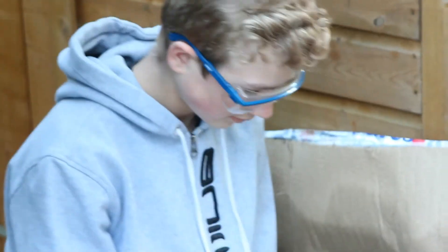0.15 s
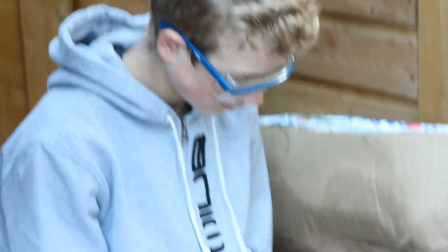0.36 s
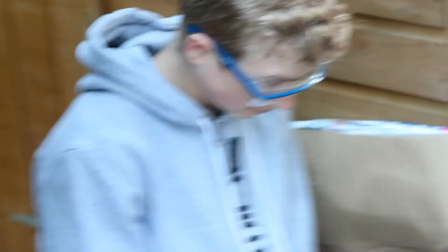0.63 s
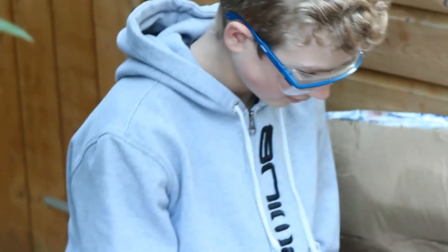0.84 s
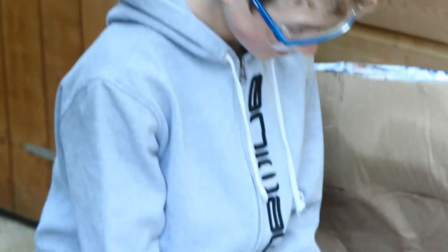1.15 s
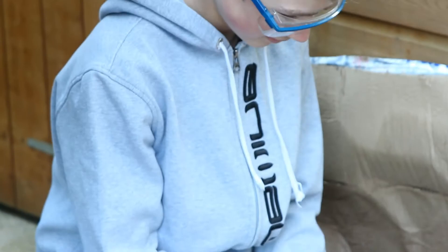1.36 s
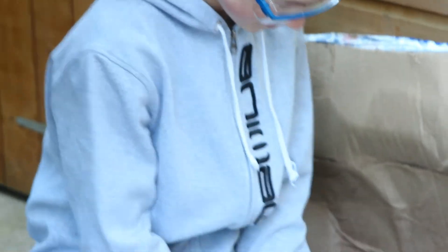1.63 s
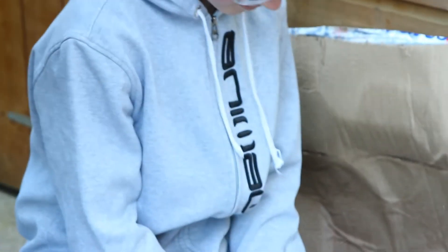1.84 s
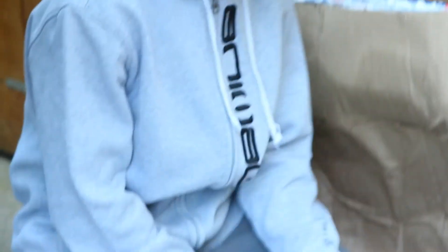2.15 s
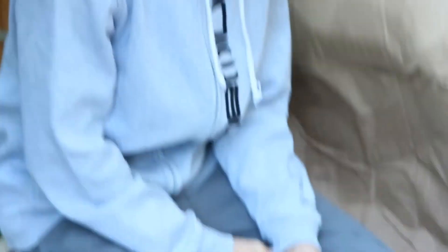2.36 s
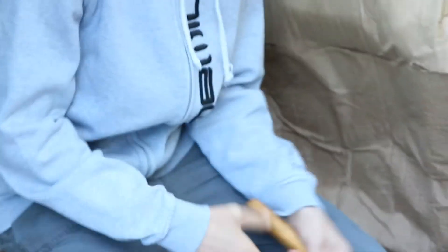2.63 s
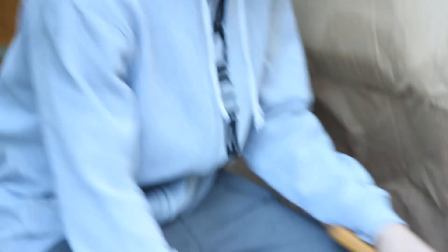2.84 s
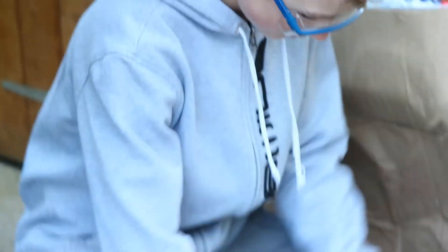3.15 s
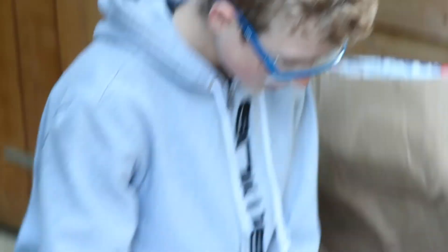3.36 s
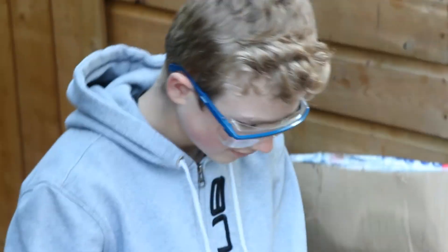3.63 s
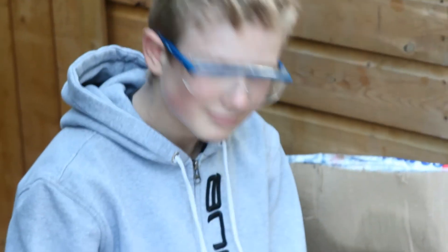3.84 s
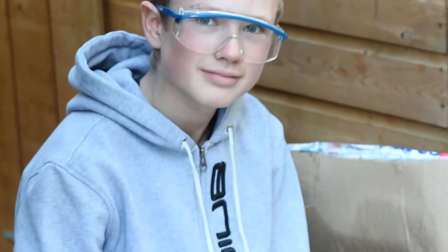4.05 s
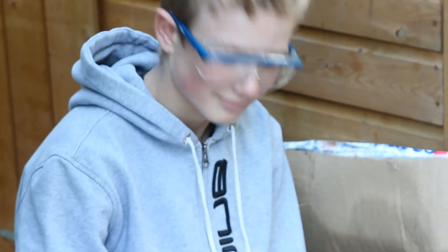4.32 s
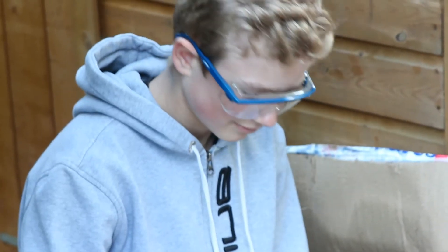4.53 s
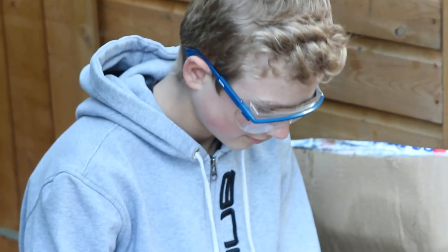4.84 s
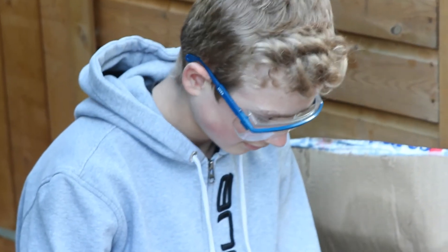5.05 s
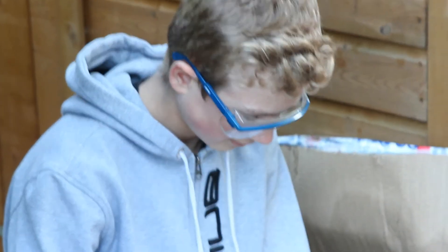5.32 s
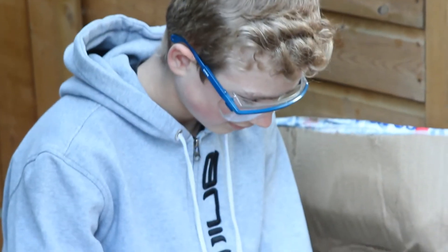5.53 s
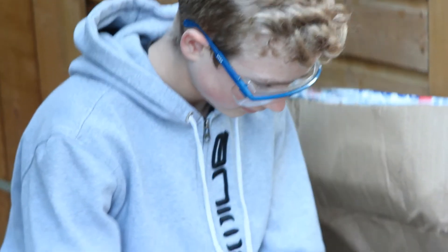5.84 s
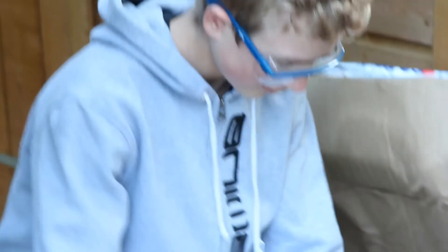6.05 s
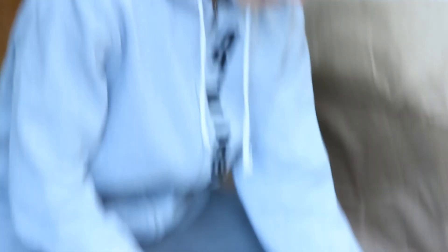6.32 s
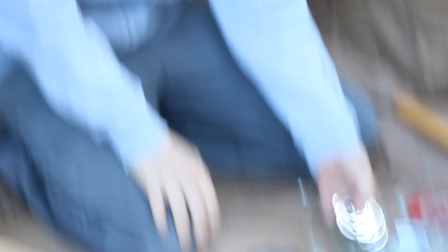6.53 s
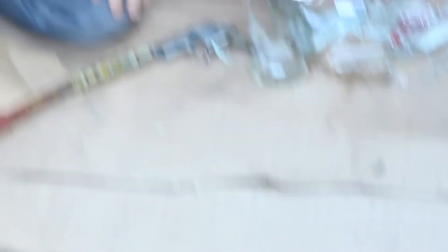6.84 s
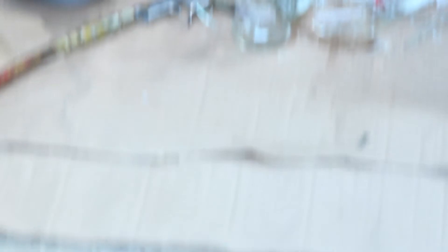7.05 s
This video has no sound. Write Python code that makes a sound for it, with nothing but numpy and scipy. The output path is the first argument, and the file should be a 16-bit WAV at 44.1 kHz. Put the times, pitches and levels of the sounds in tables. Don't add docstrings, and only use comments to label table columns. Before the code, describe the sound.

Close microphone in a yard with short echoes. A buzzing, whining compressor runs without stopping. Three violent glass knocks come half a second apart, then a crash and a brief spray of shards. Sparse clinks follow as pieces are handled. A bright jet of compressed air starts with a tiny rising whistle and stops abruptly; a few pieces knock and clink near the end. The motor sound ducks after loud events and swells back.

```python
import sys
import numpy as np
from scipy import signal
from scipy.io import wavfile
from scipy.ndimage import uniform_filter1d

SR = 44100
rng = np.random.default_rng(int(sys.argv[2]) if len(sys.argv) > 2 else 0)


def volts_from_db(level):
    exponent = np.asarray(level, float) / 20
    return 10 ** exponent


def generate_wav(sig):
    pcm = np.round(np.clip(np.atleast_2d(sig).T, -1, 1) * 32767).astype(np.int16)
    wavfile.write(sys.argv[1], SR, pcm)


N = 316638

# pitch as a multiple of the motor speed, level in dB rms.
HUM_TONES = [(2, -55), (4, -35), (5, -44), (7, -35), (9, -44), (10, -45), (11, -37), (12, -37), (15, -36),
             (16, -32), (17, -35), (18, -43), (20, -32), (21, -39), (22, -25.3), (23, -18), (24, -25.6),
             (25, -35), (26, -34), (28, -43), (29, -43), (30, -38), (38, -44), (39, -39), (44, -44),
             (46, -37), (48, -45), (54, -46), (55, -46), (56, -45)]
# time in seconds, level in dB.
WHINE_LEVEL = [(0, -2), (1.6, 1), (2.6, 1.5), (4, 0), (4.8, -0.3), (5.6, -1.5), (6.8, 3), (7.18, 2)]
# time in seconds, hiss level in dB, tilt in dB per octave.
TRIGGER = [
    (4.776, -61.5, -6.5),
    (4.902, -19.5, -0.5),
    (5.11, -17, -2.3),
    (5.26, -18.5, -0.5),
    (5.46, -16, -1),
    (5.862, -24, 1.5),
    (5.922, -63, -8),
]
# start in seconds, ring in dB, rebound delay in seconds, rebound in dB.
RINGING_BLOWS = [
    (0.001, 3, .011, -0.5),
    (0.557, 5, .013, -2),
    (1.083, -7, 0.013, 2),
]


def in_time(rows):
    s, *columns = np.transpose(rows)
    return [np.interp(np.arange(N) / SR, s, c) for c in columns]


def drift(rate_hz):
    r = np.exp(-80 * np.pi * rate_hz / SR)
    noise = rng.standard_normal(N // 40 + 2002)
    slow = signal.lfilter([1], [1, -2 * r, r * r], noise)[2000:]
    return np.interp(np.arange(N) / 40, np.arange(len(slow)), slow / slow.std())


def bands(spectrum, patchy_db, rate_hz, tilt_db=0):
    out = 0
    white = rng.standard_normal((2, N))
    points = np.array(spectrum, float)
    edges = 20 * 2 ** np.arange(0, 9.8, 1 / 3)
    for k, (low, high) in enumerate(zip(edges, edges[1:])):
        hz = np.sqrt(low * high)
        if high < points[0, 0] / 2:
            continue
        level_db = np.interp(np.log(hz), np.log(points[:, 0]), points[:, 1])
        level_db = level_db + tilt_db * np.log2(hz / 7000)
        band_pass = signal.butter(2, [low, high], "band", fs=SR, output="sos")
        band = signal.sosfilt(band_pass, white[k % 2])
        out = out + volts_from_db(level_db + patchy_db * drift(rate_hz)) * band
    return out / out.std()


def add(out, s, sound):
    i = round(s * SR)
    out[i:i + len(sound)] += sound[:N - i]


def dying(t60_s, length_s=.4):
    t = np.arange(round(length_s * SR)) / SR
    return t, volts_from_db(-60 * t / t60_s)


def resonate(clicks, hz, t60_s):
    r = volts_from_db(-60 / (t60_s * SR))
    w = 2 * np.pi * hz / SR
    return signal.lfilter([0, np.sin(w)], [1, -2 * r * np.cos(w), r * r], clicks + 1e-18)


def wind():
    low_pass = signal.butter(2, [20, 110], "band", fs=SR, output="sos")
    low = signal.sosfilt(low_pass, rng.standard_normal(N))
    return volts_from_db(-59 + 2.5 * drift(3)) * low / low.std()


def valve():
    width_hz = 250
    whistle = resonate(rng.standard_normal(N), 7120, 2.5 / width_hz)
    return volts_from_db(-60 + 2 * drift(4)) * whistle / whistle.std()


def cowl():
    width_hz = 80
    song = resonate(rng.standard_normal(N), 2485, 2.4 / width_hz)
    level_db = -43.5 + 1.5 * drift(1.0) + 1.1 * in_time(WHINE_LEVEL)[0]
    return volts_from_db(level_db) * song / song.std()


def faint_orders():
    multiples = range(13, 65)
    strong = dict(HUM_TONES)
    chance = rng.uniform(-1.2, 1, len(multiples))
    return [(m, -46 - .16 * k + 3 * chance[k]) for k, m in enumerate(multiples) if m not in strong]


def compressor(wander_db=2.0, upper_db=1.0):
    # time in seconds, motor speed in turns per second.
    speed = [(0.0, 44.471), (1.5, 44.464), (3.0, 44.471), (4.5, 44.482), (6.0, 44.487), (7.2, 44.48)]
    # multiple of motor speed, level in dB rms.
    crank = [(16.25, -42), (19.5, -49), (20.25, -48), (20.75, -38), (21.25, -35), (21.5, -46), (21.75, -42),
             (22.25, -34), (22.75, -40), (23.25, -31), (23.5, -45), (23.75, -40), (24.25, -43), (24.5, -38),
             (25.25, -42), (25.5, -44), (26.25, -47), (26.75, -45), (27.25, -47), (28.5, -47), (29.25, -48),
             (46.25, -47)]
    # frequency in Hz, level in dB per Hz.
    casing = [(40, -35), (200, -17.5), (400, -12.5), (650, -6), (850, -14), (1020, 5), (1250, -14),
              (1700, -10), (2500, -21), (3000, -20), (5000, -29), (7500, -36.5), (9000, -43.5),
              (15500, -42)]
    mesh = 23
    knock_rad, crank_rad, lag_rad = 1.6, -.45, .75
    turn = 2 * np.pi * np.cumsum(in_time(speed)[0]) / SR
    t = np.arange(N) / SR
    wanders = [volts_from_db(wander_db * drift(0.54)) for _ in range(6)]
    whine = volts_from_db(in_time(WHINE_LEVEL)[0])
    settle = volts_from_db(1 - .8 * t)
    creep = crank_rad + .22 * t
    out = 0
    for k, (multiple, db) in enumerate(HUM_TONES + faint_orders() + crank):
        whole = round(multiple)
        phase = rng.uniform(0, 2 * np.pi)
        swell = wanders[k % 6] * volts_from_db(upper_db * (multiple > 36)) if multiple > 8 else 1
        away = abs(multiple - mesh)
        if away <= 3:
            lead = creep + .7 * (whole < mesh - 1)
            phase = -whole * knock_rad + 4 * (multiple - whole) * lead
            phase = phase - lag_rad * (away in (1, 2)) + np.pi * (multiple == mesh - 2)
            if multiple % 1:
                swell = whine * settle
            else:
                swell = whine ** (1.3 - .6 * away * (away > 1))
        out = out + volts_from_db(db + 3) * swell * np.cos(multiple * turn + phase)
    throb = volts_from_db(0.51 * np.cos(turn - knock_rad))
    return out + volts_from_db(-26) * throb * bands(casing, patchy_db=1.12, rate_hz=4.3)


def leak():
    # time in seconds, pitch in Hz, level in dB.
    glide = [(4.775, 3500, -54), (4.795, 3750, -32), (4.81, 4130, -39), (4.83, 4540, -29),
             (4.86, 4970, -48)]
    hz, db = in_time(glide)
    t = np.arange(N) / SR
    is_open = (t > glide[0][0]) & (t < glide[-1][0])
    breath = uniform_filter1d(rng.standard_normal(N), size=60) * is_open
    return volts_from_db(db) * 8 * breath * np.sin(2 * np.pi * np.cumsum(hz) / SR)


def blow_gun():
    # frequency in Hz, level in dB per Hz.
    nozzle = [(710, -42), (1200, -9), (1270, -13), (1380, -9.5), (1490, -12), (1640, -7), (1950, -7),
              (4000, -2), (8500, -2), (12900, -4.5), (15700, -1)]
    hiss_db, tilt_db = in_time(TRIGGER)
    t = np.arange(N) / SR
    shut = (t < TRIGGER[0][0]) | (t > TRIGGER[-1][0])
    return volts_from_db(hiss_db) * ~shut * bands(nozzle, patchy_db=.9, rate_hz=9, tilt_db=tilt_db)


def debris():
    # time in seconds, ticks per second, level in dB.
    settling = [
        (1.63, 1300, -14),
        (1.7, 1100, -35),
        (1.85, 900, -39),
        (1.95, 250, -45),
        (2.06, 60, -57),
    ]
    start_s = settling[0][0]
    first, last = round(start_s * SR), round(settling[-1][0] * SR)
    per_s, db = (c[first:last] for c in in_time(settling))
    draw = rng.random((3, last - first))
    ticks = (draw[0] < per_s / SR) * volts_from_db(db - 2.3 * np.log(draw[1] + 0.016))
    dealt = (draw[2] * 30).astype(int)
    pitches_hz = rng.uniform(4000, 15800, size=30)
    t60s = rng.uniform(.006, 0.061, size=30)
    out = np.zeros(N)
    add(out, start_s, 1.5 * np.diff(ticks, prepend=0))
    for k, (hz, t60_s) in enumerate(zip(pitches_hz, t60s)):
        add(out, start_s, resonate(ticks * (dealt == k), hz, t60_s))
    return out


def pieces(count=12):
    # start in seconds, pitch in Hz, peak level in dB, 60 dB fade in seconds.
    single = [(1.652, 4430, -9, 0.31), (1.652, 6940, -3.5, 0.068), (1.65, 10400, -15, 0.068),
              (1.655, 12700, -10, 0.07), (1.665, 13680, -18, 0.1), (1.687, 10850, -19, 0.11),
              (1.752, 10700, -24, 0.086), (1.782, 15000, -27, 0.1), (1.797, 6880, -24, 0.12),
              (1.862, 10800, -33, .13), (1.9, 8660, -44, .16), (1.991, 8400, -39, .1),
              (2.885, 13210, -43, .1), (2.945, 7200, -43, .1), (3.093, 3590, -27, .035),
              (3.125, 9980, -48, .1), (3.24, 12250, -43, .1), (3.315, 7150, -40, .1),
              (3.375, 10490, -43, .1), (3.38, 7150, -38, .1), (2.882, 10860, -42, .1),
              (3.42, 6960, -40.5, .1), (3.718, 8210, -45, 0.091), (6.175, 4300, -19, .02),
              (6.383, 12150, -40, .16), (6.383, 13270, -39, .1), (6.58, 12230, -33, .035),
              (6.617, 13400, -30, 0.22), (6.617, 9770, -37, 0.18), (6.617, 6860, -19.5, 0.031)]
    # pitch in Hz, level in dB, 60 dB fade in seconds.
    neck_tones = [(4285, 0, 0.1), (5670, -10, .07), (9600, -23, .1), (11840, -12, 0.24), (13040, -13, .08),
                  (13580, -14, .1)]
    # start in seconds, level in dB.
    bounces = [(2.672, -25.5), (2.694, -24), (2.742, -31)]
    after = 0.021 * (np.arange(count) + rng.uniform(-.3, .3, count))
    pitches_hz = rng.permutation(np.linspace(5700, 15500, count))
    scatter = [(1.678 + s, hz, -29.5 - 66 * s, .1) for s, hz in zip(after, pitches_hz)]
    neck = []
    for s, db in bounces:
        for hz, tone_db, t60_s in neck_tones:
            neck.append((s, hz, db + tone_db + rng.normal(0, 2), t60_s))
    return single + scatter + neck


def shards():
    out = np.zeros(N)
    for s, hz, db, t60_s in pieces():
        t, fade = dying(t60_s, length_s=.12)
        tumble = 1 + 7 * uniform_filter1d(rng.standard_normal(len(t)), size=round(1e6 / hz))
        edges = np.clip(t / 0.0005, 0, 1) * np.clip((.09 - t) / .015, 0, 1)
        add(out, s, volts_from_db(db) * edges * fade * tumble * np.sin(2 * np.pi * hz * t))
    return out


def hollow():
    out = np.zeros(N)
    air, ground, head = (406, -19, 0.33), (55, -34, 0.11), (1493, -0.5, 0.031)   # Hz, dB, fade in s
    for hz, db, t60_s in (air, ground, head):
        t, fade = dying(t60_s)
        for s, *_ in RINGING_BLOWS:
            add(out, s, volts_from_db(db) * fade * np.clip(t / 0.0013, 0, 1) * np.sin(2 * np.pi * hz * t))
    return out


def bottle():
    # pitch in Hz, level in dB, 60 dB fade in seconds.
    first_tones = [(3190, -1, 0.12), (4775, -18, 0.18), (5033, -30, 0.25), (5771, -38, 0.29),
                   (6100, -9, 0.065), (7470, -13, 0.045), (8274, -40, 0.16), (9200, -19.5, 0.1),
                   (10800, -25, 0.15), (11910, -44, 0.18), (12230, -45, 0.16), (13730, -38, 0.11),
                   (15690, -53, 0.29)]
    second_tones = [(3170, -2.5, 0.13), (4130, -25, 0.1), (4800, -17, 0.09), (5840, -14, 0.1),
                    (6000, -14, 0.081), (7130, -21, 0.1), (7300, -17.5, 0.09), (9300, -21, 0.08),
                    (9650, -21, 0.084), (10700, -20, 0.14), (10700, -33, 0.12), (14700, -30, 0.1),
                    (15600, -25, 0.1), (15720, -31, 0.13)]
    third_tones = [(3176, -13, 0.17), (4830, -10.5, 0.14), (5800, -5, 0.2), (6260, -6, 0.14),
                   (6300, -2.5, 0.11), (7340, -5, 0.097), (8500, -30, 0.21), (8931, -33, 0.12),
                   (9800, -15.5, 0.097), (11600, -7, 0.2), (12700, -11, 0.086), (13800, -3, 0.12),
                   (14540, -25, 0.16), (15200, -14, 0.096)]
    out = np.zeros(N)
    for blow, tones in zip(RINGING_BLOWS, (first_tones, second_tones, third_tones)):
        s, db, after, rebound_db = blow
        for hz, tone_db, t60_s in tones:
            t, fade = dying(min(t60_s, 1100 / hz))
            split = rng.uniform(.003, .009)
            phase = rng.uniform(0, 2 * np.pi, 2)
            twin = 0.43 * np.sin(2 * np.pi * hz * (1 + split) * t + phase[0])
            tone = fade * (np.sin(2 * np.pi * hz * t) + twin)
            chatter = 1 + 5 * uniform_filter1d(rng.standard_normal(len(t)), size=150)
            tone = tone * chatter
            add(out, s, volts_from_db(db + tone_db) * tone)
            add(out, s + after, volts_from_db(db + tone_db + rebound_db) * np.cos(phase[1]) * tone)
    return out


def cracks():
    # start in seconds, peak level in dB, knock pitch in Hz, knock level in dB.
    contacts = [(.0004, -0.5, 6000, -6), (0.5554, 4.5, 4300, 5.5), (1.083, 8, 4800, -1.5),
                (1.6299, 4.5, 4580, 6.5), (1.648, -9.5, 3120, 3), (1.737, -16.5, 4200, 7.5),
                (1.752, -16, 5780, -2), (1.808, -16, 12500, -8), (1.842, -23, 8400, -4),
                (1.991, -36, 9000, -4), (2.252, -39.5, 2920, 27), (2.671, -26, 11000, -9),
                (2.6953, -29, 9450, -10), (2.7437, -28.5, 8900, 1), (2.765, -32, 3320, 11),
                (2.8814, -33, 13000, -0.5), (3.098, -38, 9150, 1.5), (3.2194, -44, 14400, 4),
                (3.3844, -35.5, 10600, -5), (3.7174, -35, 14800, -2), (6.1738, -11.5, 4650, 11),
                (6.382, -20.5, 4000, -3), (6.579, -31, 7000, 3.5), (6.5914, -38, 9000, 5.5),
                (6.6172, -11, 1580, 9)]
    out = np.zeros(N)
    wide = signal.butter(1, [2500, 14000], "band", fs=SR, output="sos")
    dull = signal.butter(2, [450, 2100], "band", fs=SR, output="sos")
    for s, db, hz, knock_db in contacts:
        t, fade = dying(0.04, length_s=.2)
        noise = rng.standard_normal((3, len(t))) * fade
        spot = signal.butter(2, [hz / 1.197, hz * 1.085], "band", fs=SR, output="sos")
        burst = signal.sosfilt(wide, noise[0])
        thud = volts_from_db(10.5 + .1 * db) * signal.sosfilt(dull, noise[1])
        knock = volts_from_db(knock_db + 13.0) * signal.sosfilt(spot, noise[2] * fade)
        add(out, s, volts_from_db(db - 6) * (burst + thud + knock))
    return out


def yard(x):
    t, fade = dying(0.2, length_s=.3)
    echoes = rng.standard_normal(len(t)) * fade * (t > .003)
    return x + volts_from_db(-8) * signal.fftconvolve(x, echoes / np.linalg.norm(echoes))[:N]


def scene():
    glass = bottle() + cracks() + shards() + debris()
    echoing = yard(glass + volts_from_db(11) * blow_gun())
    machine = compressor() + valve() + cowl()
    return (wind() + machine + leak() + hollow() + echoing)[None]


def gain_control():
    # start in seconds, depth in dB.
    ducks = [
        (-.045, 16.5),
        (.555, 16.5),
        (1.082, 17.5),
        (1.63, 12.5),
        (6.617, 2.5),
    ]
    duck_s, recover_db_per_s, lag_s = 0.0463, 37, 0.036
    t = np.arange(N) / SR
    keep = np.exp(-1 / (lag_s * SR))
    whine_db = in_time(WHINE_LEVEL)[0]
    excess = np.maximum(in_time(TRIGGER)[0] + 34.5, 0)
    late = signal.lfilter([1 - keep], [1, -keep], excess)
    down = .63 * np.minimum(excess, late)
    for s, depth_db in ducks:
        dive = np.clip((t - s) / duck_s, 0, 1) ** 0.52
        down = np.maximum(down, depth_db * dive * (t < s + duck_s + .002))
    climb = recover_db_per_s * t
    down = np.maximum.accumulate(down + climb) - climb
    return 0.05 - 0.45 * whine_db - down


def band_limit(x):
    return signal.sosfilt(signal.butter(12, 15850, fs=SR, output="sos"), x)


def record(dry):
    x = np.clip(dry * volts_from_db(gain_control()), -1, 1)
    top_cut = signal.ellip(14, .3, 85, 15830, fs=SR, output="sos")
    mix = signal.sosfilt(top_cut, x)
    return band_limit(mix)


dry = scene()
out = record(dry)
generate_wav(out)
```